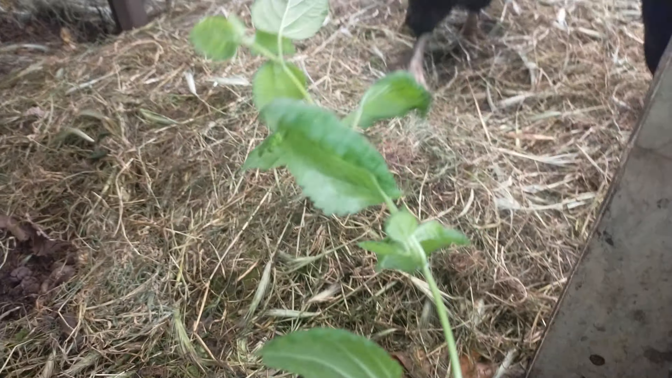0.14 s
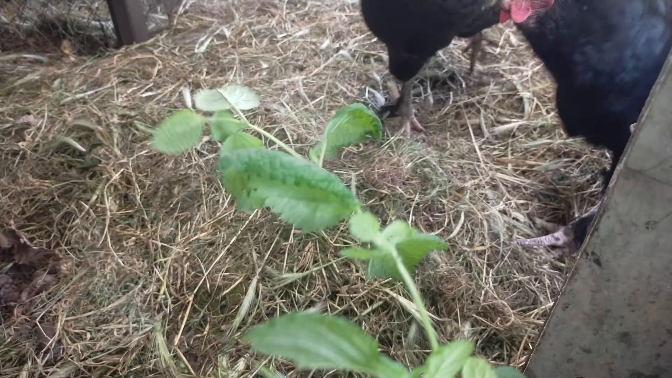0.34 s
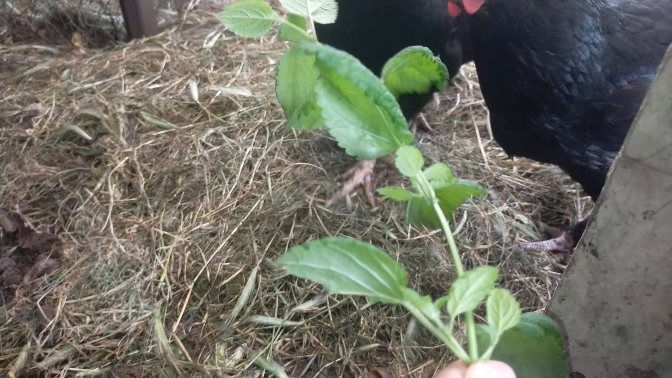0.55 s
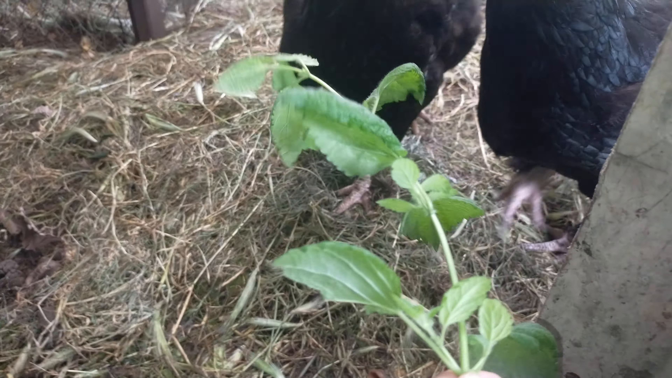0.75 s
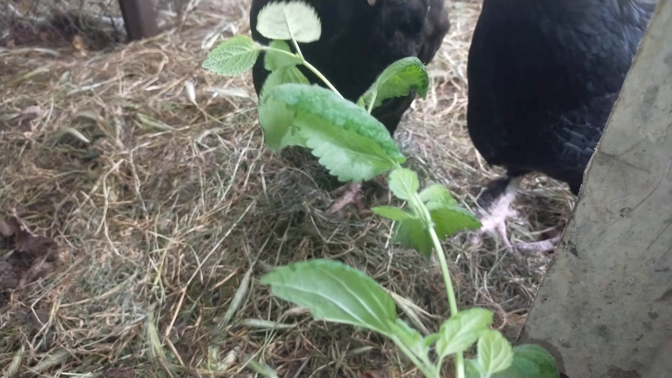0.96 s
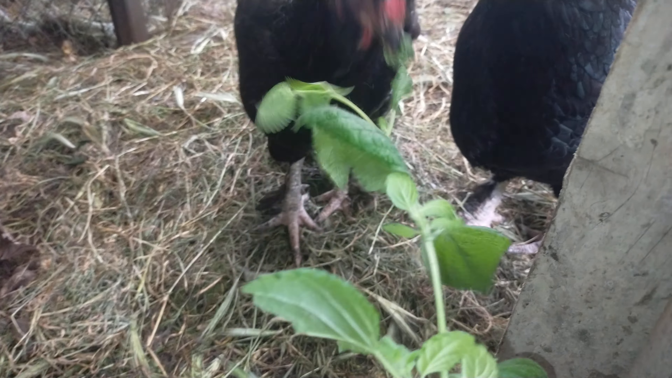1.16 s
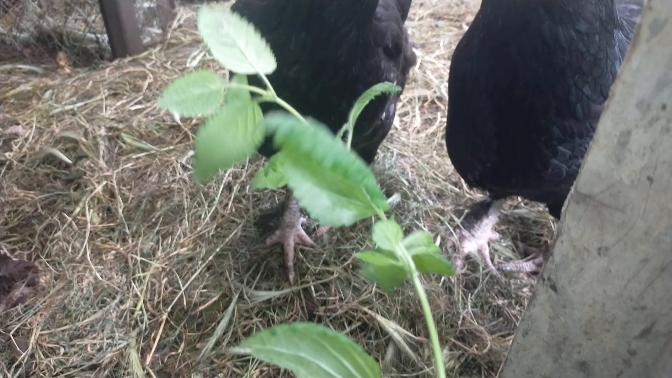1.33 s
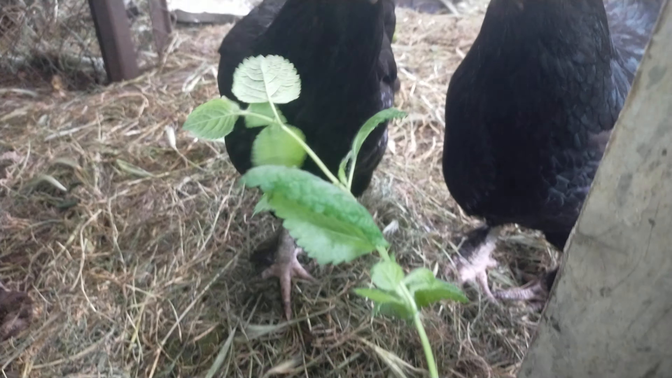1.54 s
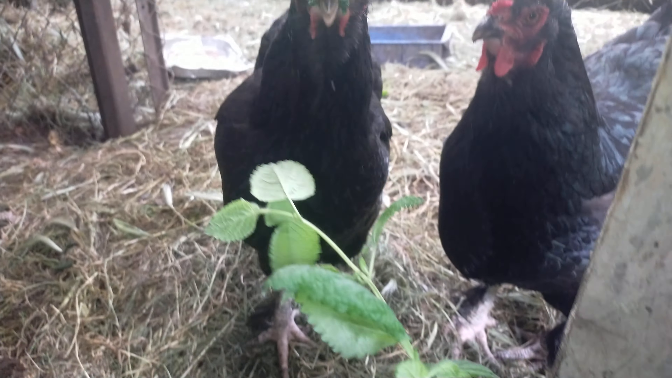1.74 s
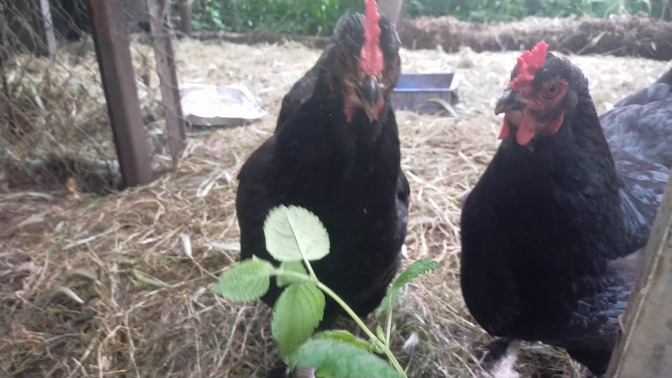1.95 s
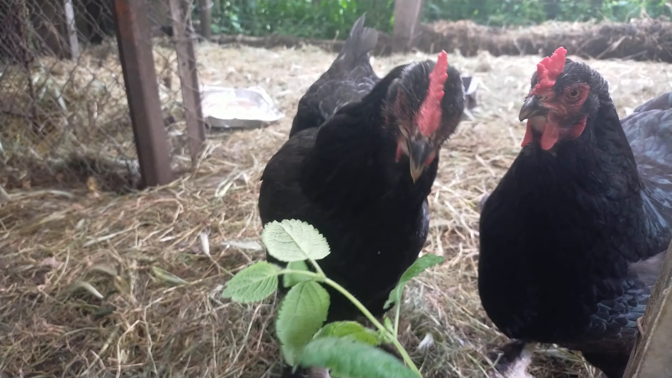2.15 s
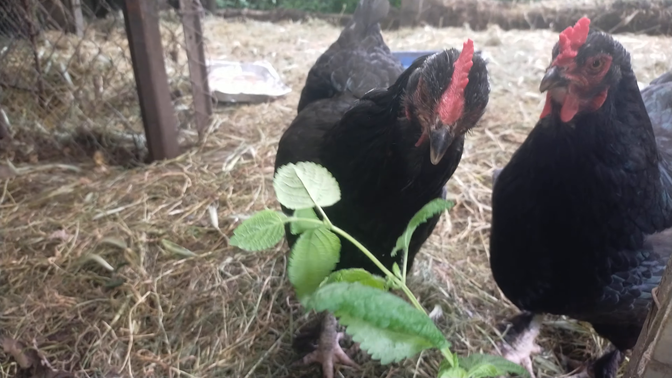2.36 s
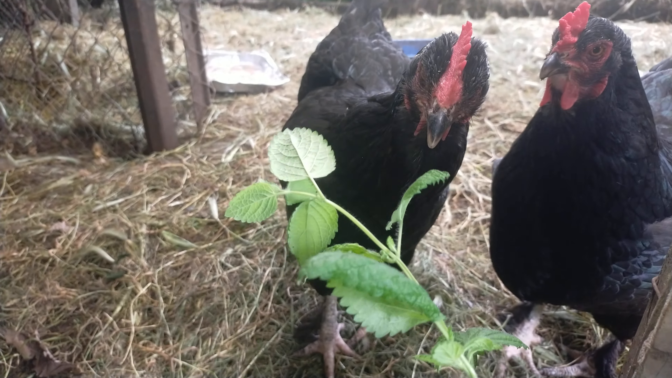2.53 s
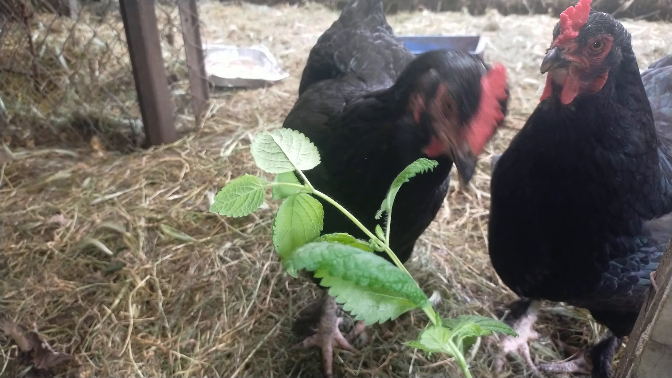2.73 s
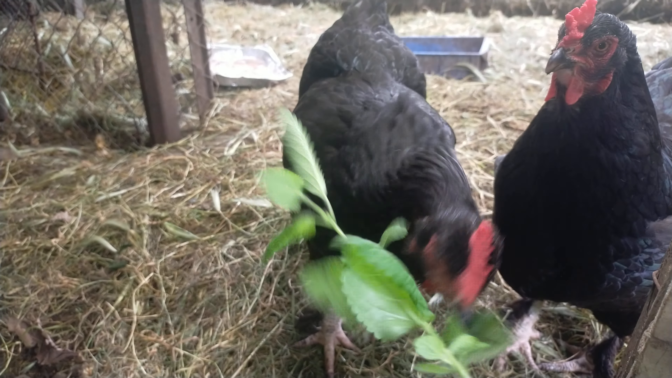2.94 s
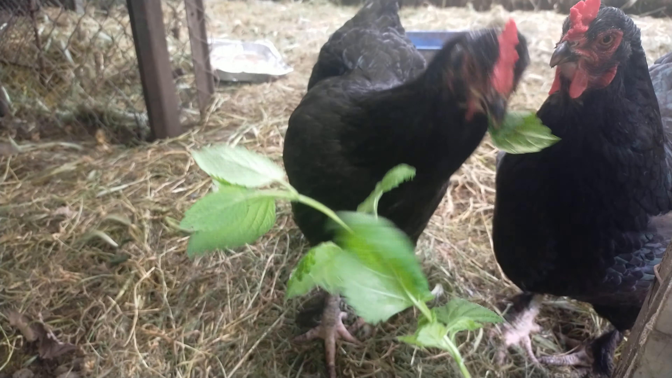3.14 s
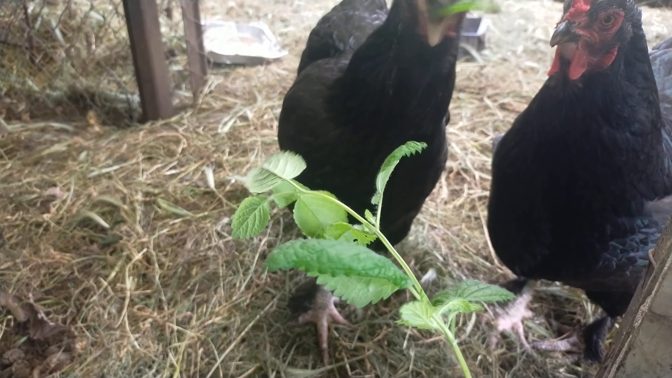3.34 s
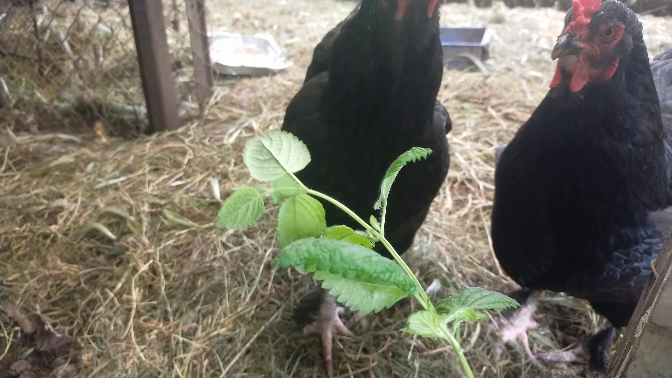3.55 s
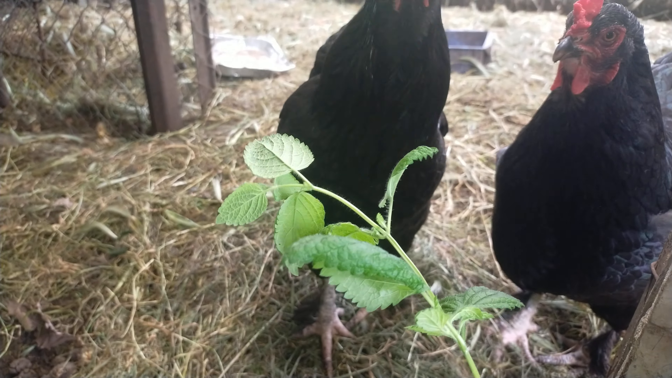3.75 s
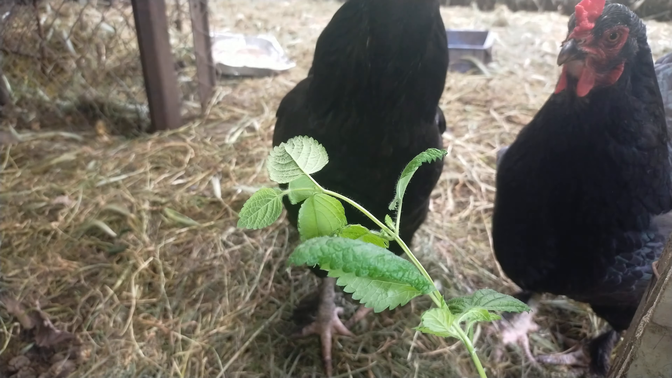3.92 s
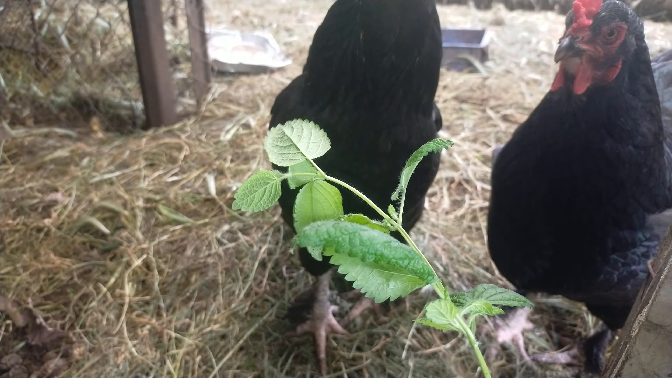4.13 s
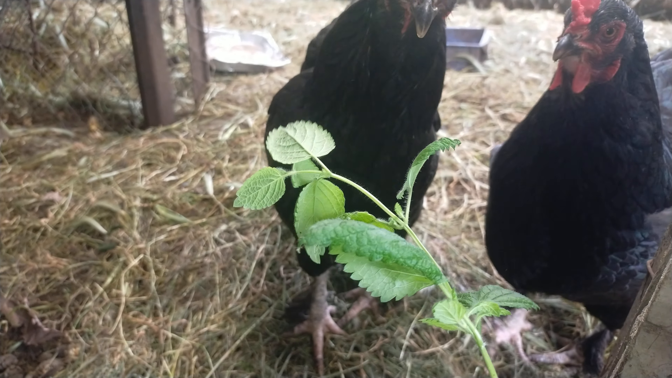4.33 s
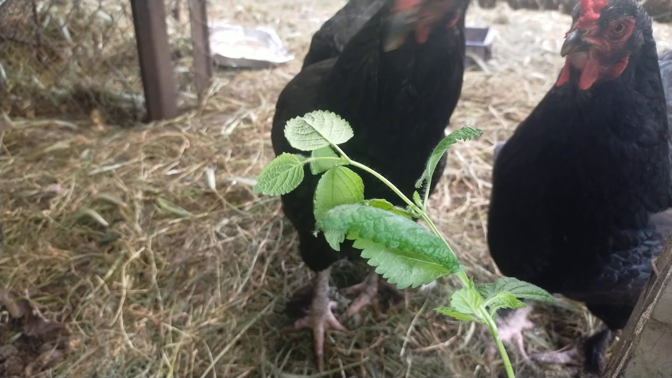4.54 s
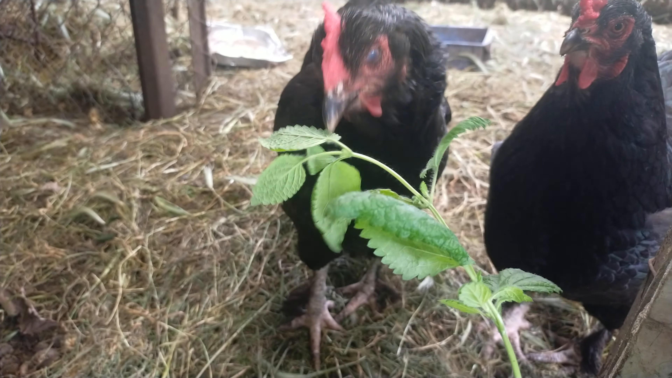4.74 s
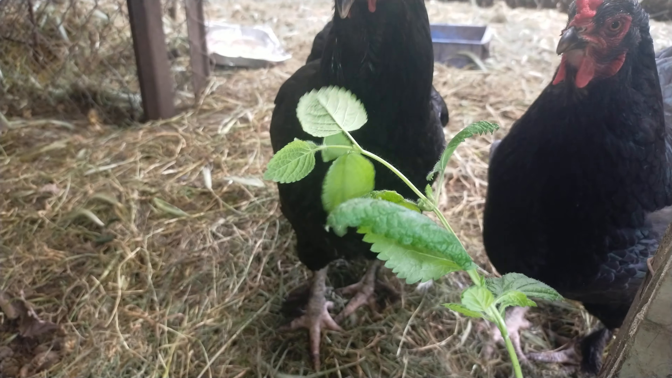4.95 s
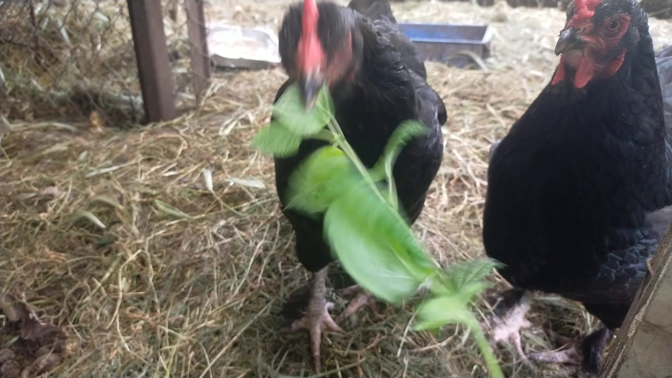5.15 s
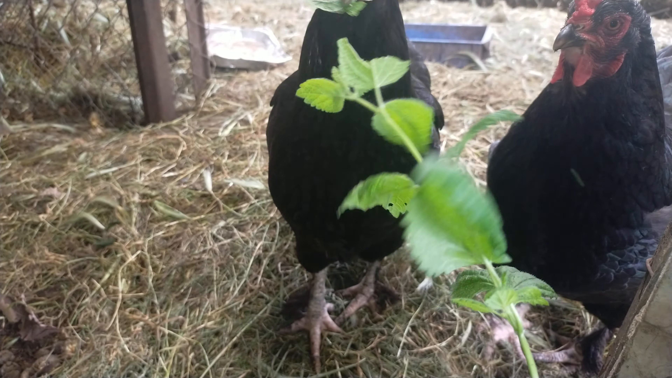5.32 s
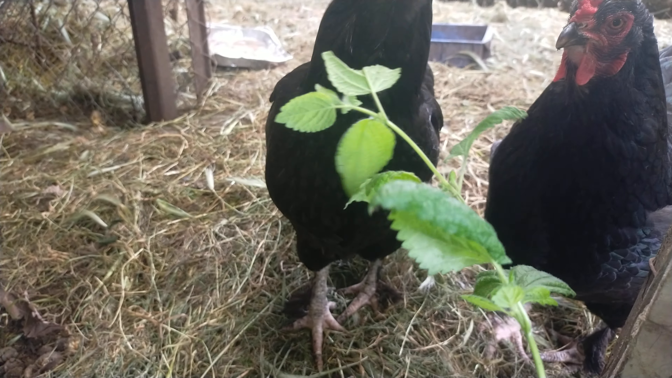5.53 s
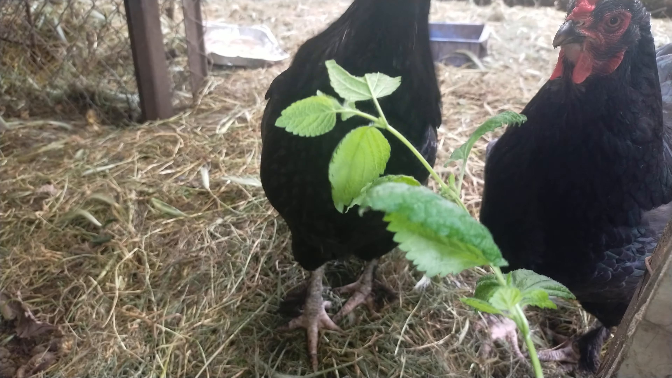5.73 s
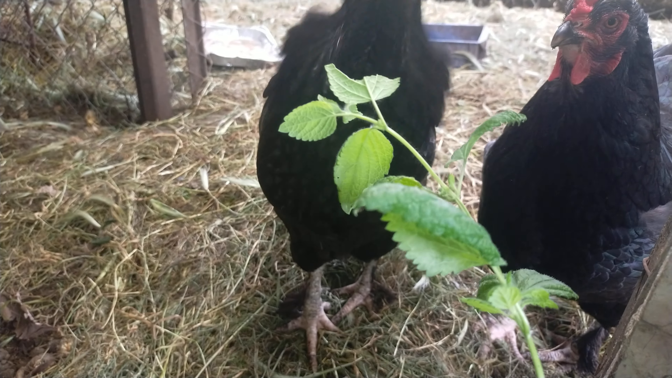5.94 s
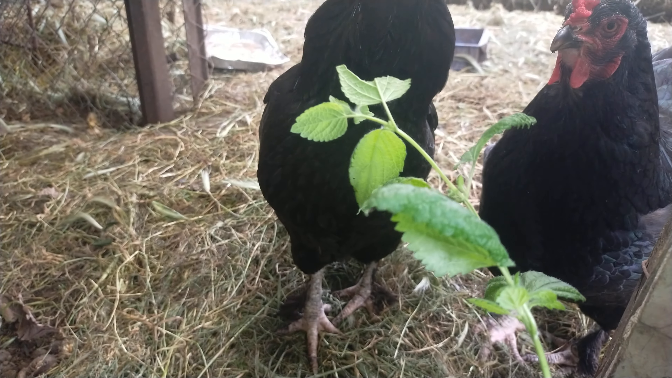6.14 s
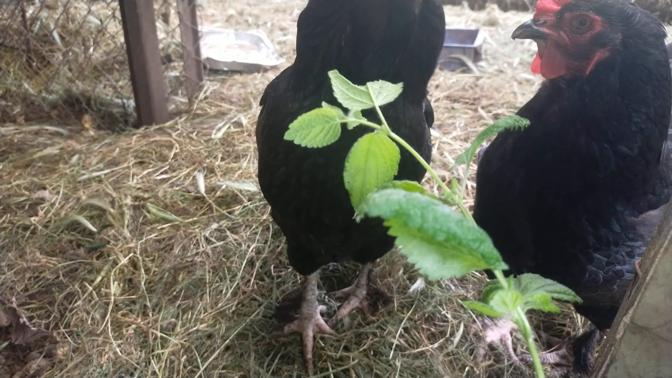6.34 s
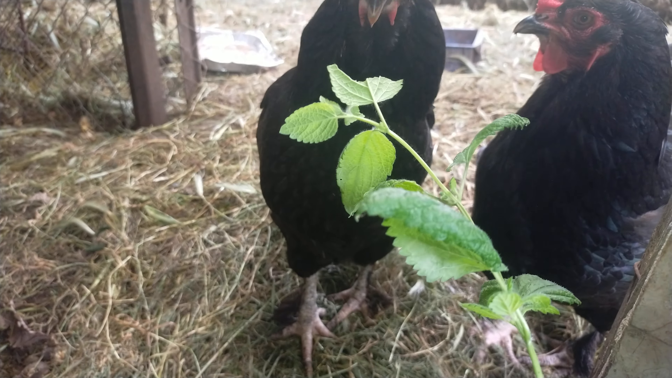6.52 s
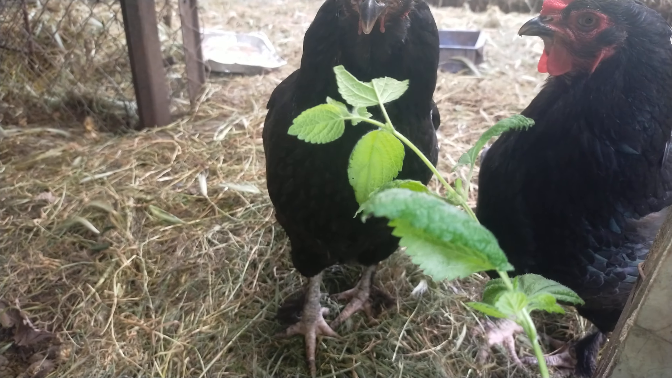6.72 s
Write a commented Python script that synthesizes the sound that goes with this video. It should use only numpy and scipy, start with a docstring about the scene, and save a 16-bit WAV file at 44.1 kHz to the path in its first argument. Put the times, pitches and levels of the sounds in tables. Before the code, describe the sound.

Outdoor hen yard, close single-channel microphone. Straw crackles finely in uneven brushes, with soft thuds and bright, dry leaf snaps. The strongest peck cracks at about three seconds, followed by bumps and small hollow taps. Behind, a car's gentle tyre roar rises and recedes early, then a distant hum swells and slowly dies. Faint bird twitters appear later as the straw settles to near quiet over rumble and hiss.

```python
"""Crisp leaf snaps, rustling straw, dull bumps and small hollow taps: two hens step about in straw
and peck at a leafy sprig close to the microphone. A car passes, a drone swells and fades, and small
birds twitter faintly over low rumble and hiss. Snaps are filtered clicks, straw is a crowd of tiny
clicks, bumps and taps are dying sines, birds are gliding sines, and the rest is shaped noise."""
import sys
import numpy as np
from scipy import signal
from scipy.fft import rfft, irfft, next_fast_len
from scipy.io import wavfile

SR = 44100
rng = np.random.default_rng(int(sys.argv[2]) if len(sys.argv) > 2 else 0)


def transcribe(signal):
    """Save signal, clipped to [-1, 1], as a 16-bit WAV file at the path in sys.argv[1]."""
    frames = np.atleast_2d(signal).T
    limited = np.clip(frames, -1, 1)
    pcm = np.round(limited * 32767).astype(np.int16)
    wavfile.write(sys.argv[1], SR, pcm)


N = 303408
TIME = np.arange(N) / SR

# dull bumps close to the microphone: t/s, peak before softening/dB, f/Hz, cycles until 60 dB down
BUMP_EVENTS = [(0.042, -26.5, 392, 5), (0.145, -31, 390, 5.5), (0.39, -35, 600, 1),
               (0.8038, -30.5, 114, 2.5), (0.804, -39.5, 454, 6.5), (0.982, -38.5, 212, 5),
               (1.351, -36.5, 147, 3.5), (2.472, -30, 503, 0.5), (2.492, -24.5, 494, 1.5),
               (2.5141, -30.5, 480, 1), (2.567, -36.5, 550, 2), (2.904, -37.5, 483, 1.3),
               (3.2006, -33, 574, 1.5), (3.259, -32.5, 600, 1.3), (3.304, -30, 338, 5),
               (3.314, -34.5, 300, 5), (3.335, -28, 307, 6)]


def from_db(db):
    """Turn decibels into a gain."""
    return 10 ** (np.asarray(db) / 20)


def rms_one(x):
    """Scale a sound to an rms of 1."""
    return x / np.sqrt(np.mean(x ** 2) + 1e-20)


def peak_one(x):
    """Scale a sound so that its highest peak is 1."""
    return x / np.max(np.abs(x))


def in_time(points):
    """Join (time, value) points with straight lines, giving a value for every sample."""
    times, values = np.transpose(points)
    return np.interp(TIME, times, values)


def add(out, s, sound):
    """Mix a short sound in, starting at s seconds."""
    i = int(np.clip(s * SR, 0, N - 1))
    out[i:i + len(sound)] += sound[:N - i]


def coloured(x, spectrum):
    """Filter a signal with a smooth curve of level over frequency; the result has rms 1."""
    hz, db = np.transpose(spectrum)
    size = next_fast_len(N + 4096)
    bins_hz = np.maximum(np.fft.rfftfreq(size, 1 / SR), 1)
    gain = from_db(np.interp(np.log(bins_hz), np.log(hz), db))
    return rms_one(irfft(rfft(x, size) * gain, size)[:N])


def drift(rate):
    """Wander at random with rms 1, heading for a new value `rate` times a second."""
    values = rng.standard_normal(4000)
    return rms_one(np.interp(TIME * rate, np.arange(4000), values))


def resonance(x, hz, width_hz):
    """Favour one frequency, as a ringing body does; the gain at its top is 1."""
    r = np.exp(-np.pi * width_hz / SR)
    forward = np.array([1, 0, -1]) * (1 - r * r) / 2
    feedback = [1, -2 * r * np.cos(2 * np.pi * hz / SR), r * r]
    return signal.lfilter(forward, feedback, x)


def ring(hz, t60):
    """A struck body rings as a sine with peak 1 that falls by 60 dB in t60 seconds."""
    t = TIME[:SR // 8]
    return peak_one(np.sin(2 * np.pi * hz * t) * from_db(-60 * t / t60))


def outdoors(air_db=1.5, hiss_db=-76, flutter_db=0.05):
    """Low air is bass-heavy noise that wavers very slightly; a faint even hiss lies over it."""
    # low air at the microphone: t/s, level before air_db is added/dB
    air_level = [(0.0, -58.5), (0.32, -59.5), (1.8, -62), (2.14, -61), (6.88, -66.5)]
    # balance of the low air: f/Hz, level per Hz/dB
    rumble_spectrum = [(15, -2), (30, 1.5), (70, 1.5), (110, -2), (150, -9), (200, -11.5), (400, -17.5),
                       (900, -45.5)]
    # balance of the hiss: f/Hz, level per Hz/dB
    hiss_spectrum = [(200, 11), (1000, 10.5), (2000, 2), (3000, -4), (4200, -6.5), (5500, -3.5),
                     (7200, 1.5), (8400, -6.5), (9500, -31.5)]
    level_db = in_time(air_level) + air_db + flutter_db * drift(9.9)
    air = from_db(level_db) * coloured(rng.standard_normal(N), rumble_spectrum)
    hiss = from_db(hiss_db) * coloured(rng.standard_normal(N), hiss_spectrum)
    return air + hiss


def drone(hz=128, width_hz=35, octave_db=-6):
    """A far hum: noise in a low resonance and its octave swells quickly and dies away slowly."""
    peak_s, peak_db = 3.95, -64
    rise_db_per_s, fall_db_per_s = 70.5, 9.5
    since = TIME - peak_s
    noise = rng.standard_normal(N)
    level_db = peak_db + np.minimum(rise_db_per_s * since, -fall_db_per_s * since)
    octave = from_db(octave_db) * resonance(noise, 2 * hz, width_hz)
    return from_db(level_db) * rms_one(resonance(noise, hz, width_hz) + octave)


def birds(level_db=6, echo_t60=0.12, unevenness=0.18, spread=0.035, warble_depth=0.033, loudness_db=2.5):
    """Far birds sing runs of short gliding, warbling notes, blurred by echoes across the yard."""
    # runs of quick notes: start/s, end/s, first f/Hz, last f/Hz, level before level_db is added/dB
    runs = [(3.65, 3.69, 3430, 3450, -79), (4.34, 4.43, 6100, 5850, -74), (4.621, 5.899, 4700, 4720, -90),
            (5.299, 6.3, 3500, 3520, -90.5), (5.815, 5.858, 6400, 4200, -79),
            (5.921, 5.949, 2540, 1900, -84), (6.05, 6.087, 2850, 2200, -80), (6.56, 6.669, 2200, 2920, -86),
            (6.679, 6.79, 3350, 3500, -89)]
    note_s, notes_per_s = 0.035, 19
    out = np.zeros(N)
    along = np.linspace(0, 1, int(note_s * SR))
    warble = 1 + warble_depth * drift(220)
    for start, end, first_hz, last_hz, db in runs:
        for s in np.arange(start, end, 1 / notes_per_s):
            late, glide, offset, loud = rng.standard_normal(4)
            tune_hz = np.interp(s + note_s * along, [start, end], [first_hz, last_hz])
            bend = 1 + spread * (offset / 2 + glide * (2 * along - 1))
            hz = tune_hz * bend * np.roll(warble, -int(s * SR))[:len(along)]
            # adding up the frequency gives the phase; the half sine fades each note in and out
            note = np.sin(np.pi * along) * np.sin(2 * np.pi * np.cumsum(hz) / SR)
            note_db = db + level_db + loudness_db * loud
            add(out, s + unevenness * late / notes_per_s, from_db(note_db) * note)
    # scattered echoes: noise that dies away
    t = TIME[:SR // 3]
    echoes = rng.standard_normal(len(t)) * from_db(-60 * t / echo_t60)
    return signal.fftconvolve(out, echoes / np.linalg.norm(echoes))[:N]


def car(engine_db=-9, engine_hz=80, engine_width_hz=50):
    """A car passes at a steady speed: tyre roar and engine rumble get weaker with distance."""
    # balance of the tyre roar: f/Hz, level per Hz/dB
    tyre_spectrum = [(100, -6), (200, -0.5), (370, -3.5), (560, -7), (720, 0.5), (900, 3), (1080, -0.5),
                     (1350, -9.5), (2100, -18.5), (3000, -35.5), (5000, -35)]
    nearest_s, tyres_db = 1.67, -50   # moment and tyre level at the nearest point
    road_m, speed_m_per_s = 5.55, 16.87
    distance_m = np.hypot(road_m, speed_m_per_s * (TIME - nearest_s))
    tyres = coloured(rng.standard_normal(N), tyre_spectrum)
    engine = rms_one(resonance(rng.standard_normal(N), engine_hz, engine_width_hz))
    return from_db(tyres_db) * road_m / distance_m * (tyres + from_db(engine_db) * engine)


def taps(level_db=-2):
    """Each hollow tap sets off the same few rings, with slightly different strengths."""
    # small hollow taps: t/s, level before level_db and the ring's own level are added/dB
    tap_events = [(3.293, -55), (3.457, -55), (3.757, -55.5), (3.768, -53.5), (4.801, -53.5),
                  (6.045, -52.5)]
    # what the taps ring with: f/Hz, relative level/dB, time to fall by 60 dB/s
    tap_rings = [(667, -0.5, 0.046), (902, 9.5, 0.0262), (1750, -10, 0.023)]
    out = np.zeros(N)
    for s, tap_db in tap_events:
        for hz, ring_db, t60 in tap_rings:
            chance_db = rng.normal(0, 0.58)
            add(out, s, from_db(tap_db + level_db + ring_db + chance_db) * ring(hz, t60))
    return out


def bumps(contact_hz=1300):
    """Soft contacts: a low-pass filter rounds off the blow, and each dies within a few cycles."""
    out = np.zeros(N)
    softness = signal.butter(2, contact_hz, fs=SR, output="sos")
    for s, peak_db, hz, cycles in BUMP_EVENTS:
        blow = -ring(hz, cycles / hz)
        add(out, s, from_db(peak_db) * signal.sosfilt(softness, blow))
    return out


def crackle(grains_per_s, size_db):
    """Dry stems slip over each other in tiny clicks of uneven size; the result has rms 1."""
    # balance of the straw: f/Hz, level per Hz/dB
    straw_spectrum = [(500, -23.5), (1800, -20), (3000, -24.5), (4000, -28.5), (4700, -21), (5500, -17),
                      (6200, -5.5), (7000, -0.5), (7600, -1.5), (8100, -13.5), (9500, -37)]
    sizes = from_db(size_db * np.minimum(rng.exponential(1, N), 4))
    signs = rng.choice([-1, 1], N)
    happens = rng.random(N) < grains_per_s / SR
    return coloured(sizes * signs * happens, straw_spectrum)


def rustle(stir_db=-1.5, clump_db=2.5, shuffle_db=1.0, stem_share=0.92, stem_width_hz=700,
           splinter_share=0.83, catch_db=4.0):
    """Straw stirs in uneven shuffles; brushes swell and fade, catch, splinter and ring a stem."""
    # straw stirring underfoot: t/s, level before stir_db is added/dB
    stirring = [(0.0, -68), (1.03, -60), (1.44, -65), (1.65, -56), (2.55, -72), (2.76, -73), (2.99, -62),
                (3.12, -56), (3.2, -61), (3.62, -63), (3.72, -68), (4.54, -79.5), (5.15, -77.5),
                (5.33, -68.5), (5.59, -71), (5.94, -71.5), (6.09, -76.5), (6.88, -81.5)]
    # brushes of feet, feathers and leaves: start/s, length/s, level before the swell/dB, stem f/Hz
    brushes = [(0, 0.092, -56, 7300), (0.21, 0.1, -53, 6850), (0.525, 0.022, -56, 7100),
               (0.592, 0.19, -54.5, 7200), (1.113, 0.058, -44, 7100), (1.207, 0.075, -39.5, 7300),
               (1.388, 0.054, -52, 6860), (1.465, 0.04, -45.5, 6840), (1.506, 0.13, -56, 6340),
               (1.65, 0.075, -56, 6860), (1.873, 0.032, -50, 6960), (2.23, 0.069, -50, 7700),
               (2.304, 0.037, -55, 7300), (2.947, 0.056, -44.5, 7200), (3.056, 0.072, -42.5, 7150),
               (3.207, 0.033, -45, 7100), (3.268, 0.018, -46.5, 6300), (3.355, 0.028, -50.5, 6700),
               (3.39, .075, -50.5, 7000), (3.548, 0.034, -51, 7100), (3.7, 0.065, -53.5, 6600),
               (4.077, 0.11, -57, 7240), (4.183, 0.036, -55.5, 7200), (4.73, 0.16, -64.5, 7200),
               (5.164, 0.091, -49, 7100), (5.407, 0.025, -58, 7000), (5.774, 0.064, -63.5, 7260),
               (5.964, 0.12, -58.5, 7100), (6.35, 0.068, -69, 7120)]
    stir_level_db = in_time(stirring) + stir_db + shuffle_db * drift(24) + clump_db * drift(76)
    out = from_db(stir_level_db) * crackle(grains_per_s=3500, size_db=3.0)
    # many fine grains with fewer splinters among them
    grains = crackle(grains_per_s=3378, size_db=2.5)
    grains = grains + splinter_share * crackle(grains_per_s=130, size_db=2.0)
    grains = grains * from_db(catch_db * drift(60))
    for s, length, db, stem_hz in brushes:
        piece = grains[int(s * SR):][:int(length * SR)]
        piece = piece + stem_share * resonance(piece, stem_hz, stem_width_hz)
        swell = np.sin(np.pi * np.linspace(0, 1, len(piece)))
        add(out, s, from_db(db) * swell * rms_one(piece))
    return out


def snaps(width_hz=1150, fibres_db=-21, fibres_t60=0.043, crack_hz=5500, spray_db=6):
    """A stalk gives way in one crack, then its fibres part in a short spray of smaller ones."""
    # leaf and stalk snaps: t/s, ring peak/dB, ring f/Hz, crack relative to the ring before a 4 dB cut/dB
    snap_events = [(0.042, -35, 6700, 4), (0.232, -34.5, 6700, -11), (0.335, -39, 7140, -26),
                   (1.139, -20, 7170, -11), (1.2006, -17, 7000, -5.5), (1.218, -22, 7200, 5.5),
                   (1.2195, -12.5, 6800, -14), (1.2525, -23, 7000, -4), (1.47, -36, 7000, -21),
                   (1.484, -30.5, 6800, -17), (1.6, -37.5, 6960, -11), (1.755, -34.5, 6800, 2),
                   (1.918, -29.5, 7170, 1.5), (2.979, -21, 7250, -8), (2.98, -24, 7200, -19),
                   (3.057, -11, 6500, -8), (3.0594, -7, 6700, -15), (3.0637, -4, 6660, -14.5),
                   (3.071, -22.5, 6840, 0), (3.084, -28, 7000, -16), (3.1036, -23.5, 7120, -8),
                   (3.29, -32.5, 6600, -5), (3.303, -31.5, 6760, 1.5), (3.428, -42, 6400, 7.5),
                   (3.595, -37.5, 6700, -1.5), (4.79, -41.5, 6970, 0.5), (5.2609, -26, 6800, 3),
                   (5.2675, -28.5, 7100, 6), (5.284, -25.5, 6920, -6), (5.291, -33.5, 6800, 2),
                   (5.304, -33, 6900, -2.5), (5.368, -40.5, 7200, -27), (6.044, -43, 6600, -20)]
    out = np.zeros(N)
    t = TIME[:SR // 16]
    broad = signal.butter(1, [350, crack_hz], "band", fs=SR, output="sos")
    # every bump jolts a stem, which ticks 14.5 dB below the bump's listed level
    ticks = [(s, bump_db - 14.5, 6700, -22) for s, bump_db, _, _ in BUMP_EVENTS]
    for s, peak_db, hz, crack_db in snap_events + ticks:
        click = signal.unit_impulse(len(t))
        parting = rng.random(len(t)) < 0.2
        fibres = rng.standard_normal(len(t)) * parting * from_db(fibres_db - 60 * t / fibres_t60)
        crisp = resonance(resonance(click + fibres, hz, width_hz), hz, width_hz)
        crack = signal.sosfilt(broad, click + from_db(spray_db) * fibres)
        snap = peak_one(crisp) + from_db(crack_db - 4) * peak_one(crack)
        add(out, s, from_db(peak_db) * snap)
    return out


def scene():
    """Put the hens close by and the neighbourhood behind them, in one channel."""
    neighbourhood = outdoors() + drone() + birds() + car()
    hens = taps() + bumps() + rustle() + snaps()
    return (neighbourhood + hens)[None]


def record(dry):
    """The microphone colours the treble unevenly, and the top is cut steeply."""
    # the microphone's colour, one resonance after another: f/Hz, width/Hz, gain at the top/dB
    colour = [(2920, 400, -6.5), (3751, 240, 1), (4650, 440, 5.5), (5480, 250, 7)]
    for hz, width_hz, db in colour:
        dry = dry + (from_db(db) - 1) * resonance(dry, hz, width_hz)
    # low-pass at 7900 Hz: 0.3 dB ripple below, at least 42 dB down well above
    steep = signal.ellip(6, 0.3, 42, 7900, fs=SR, output="sos")
    return signal.sosfilt(steep, dry)


dry = scene()
out = record(dry)
transcribe(out)
```